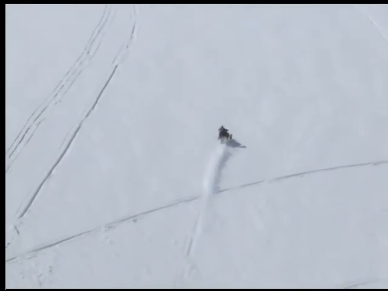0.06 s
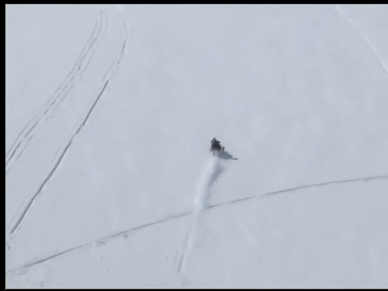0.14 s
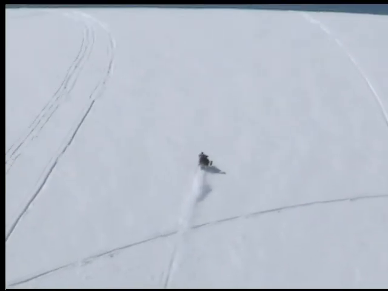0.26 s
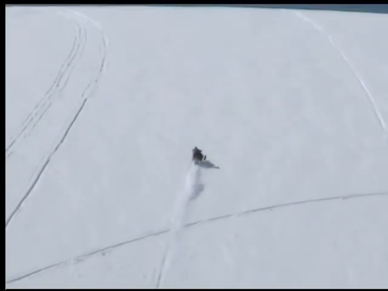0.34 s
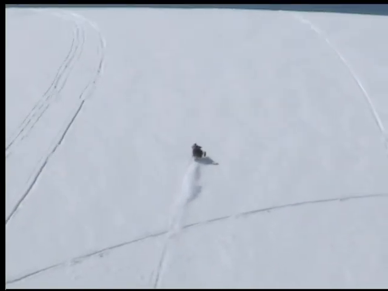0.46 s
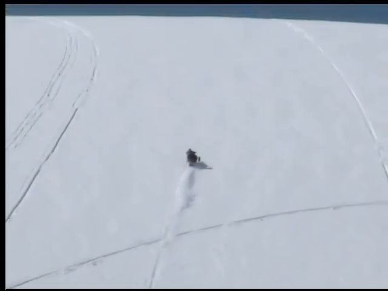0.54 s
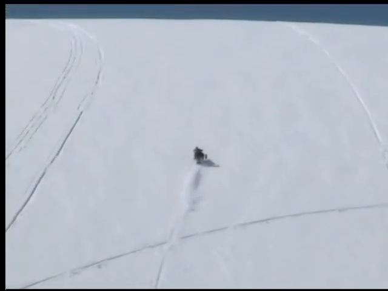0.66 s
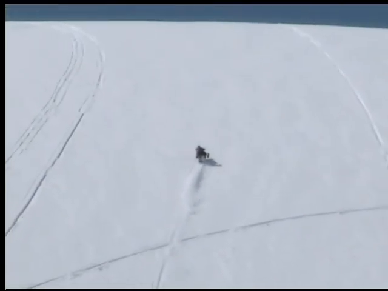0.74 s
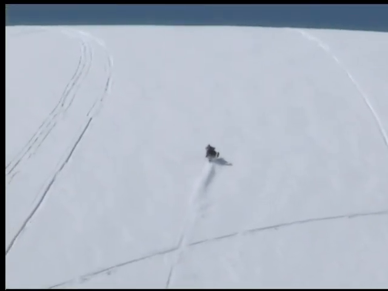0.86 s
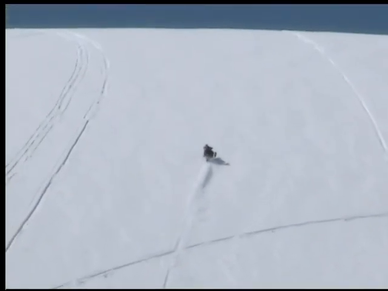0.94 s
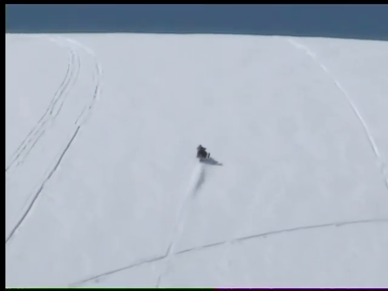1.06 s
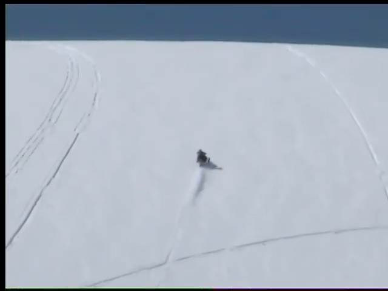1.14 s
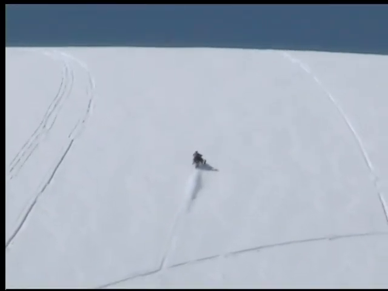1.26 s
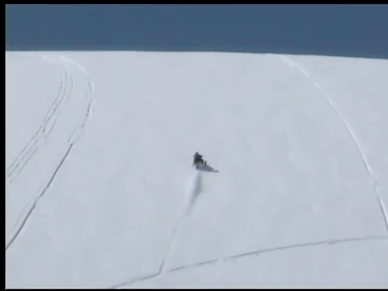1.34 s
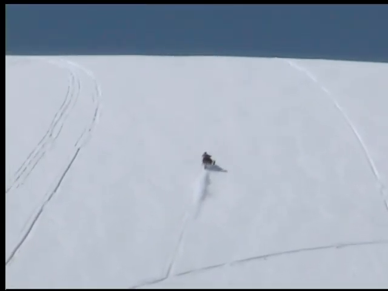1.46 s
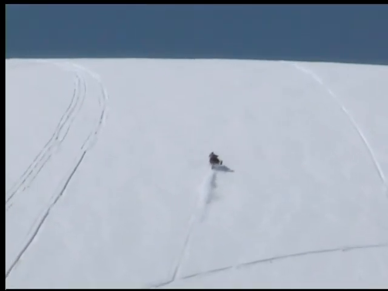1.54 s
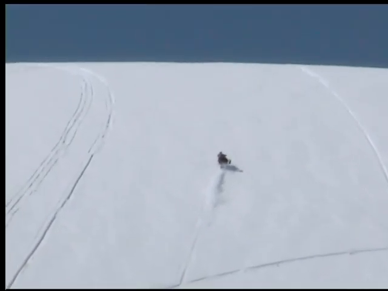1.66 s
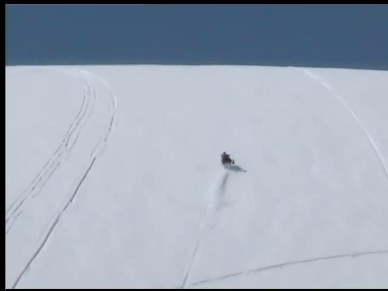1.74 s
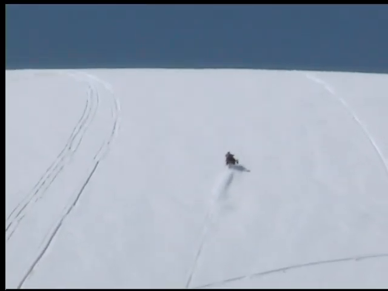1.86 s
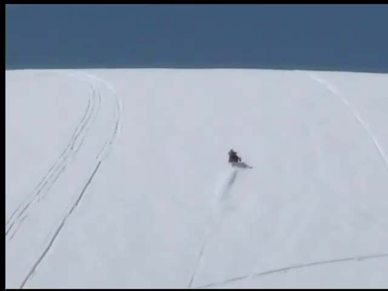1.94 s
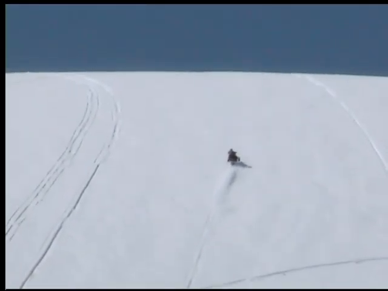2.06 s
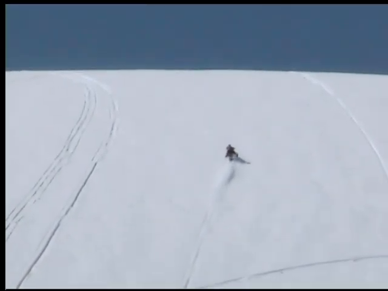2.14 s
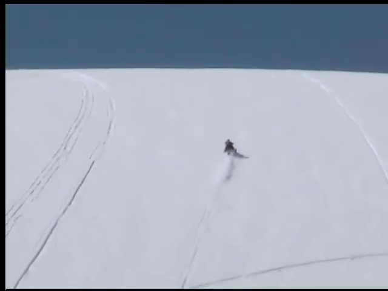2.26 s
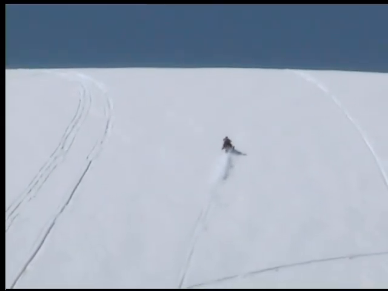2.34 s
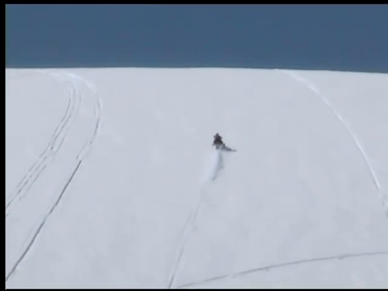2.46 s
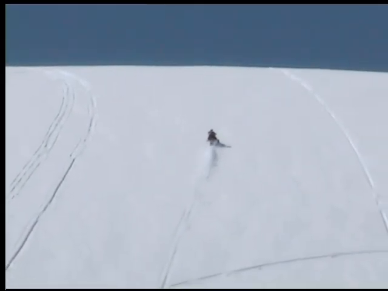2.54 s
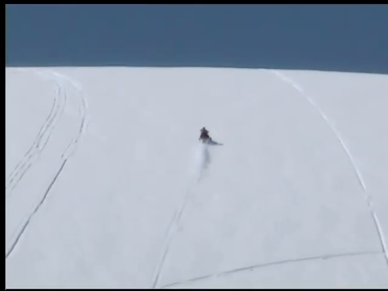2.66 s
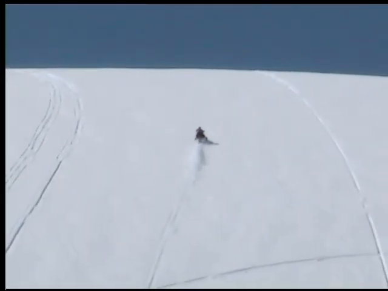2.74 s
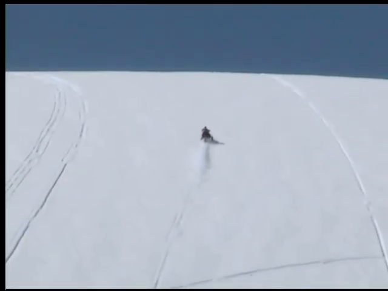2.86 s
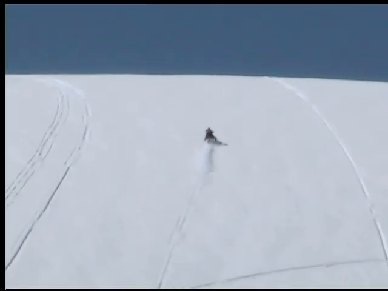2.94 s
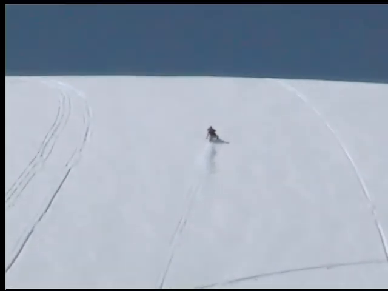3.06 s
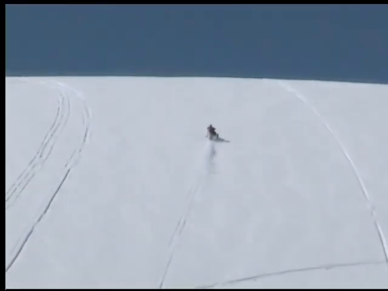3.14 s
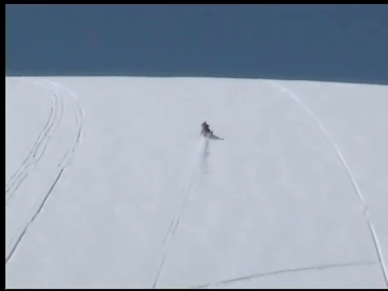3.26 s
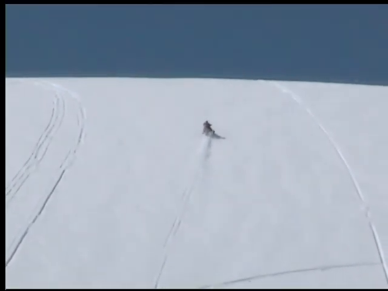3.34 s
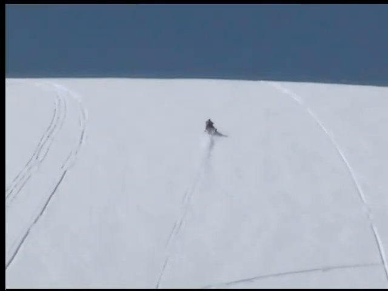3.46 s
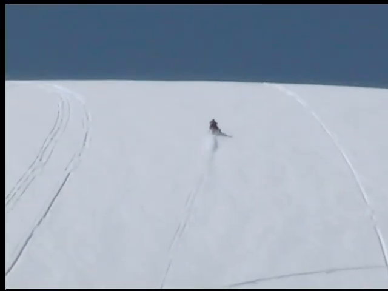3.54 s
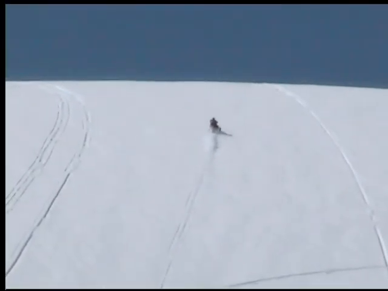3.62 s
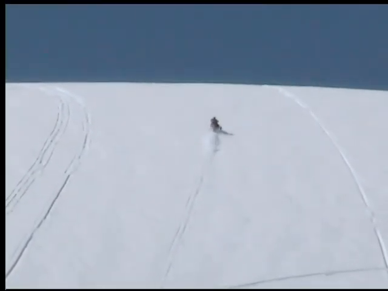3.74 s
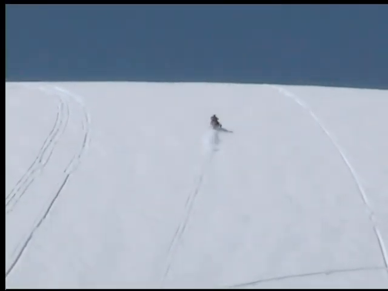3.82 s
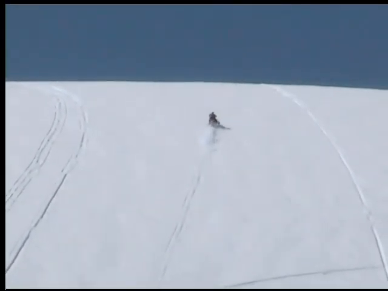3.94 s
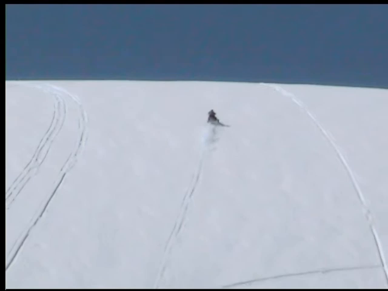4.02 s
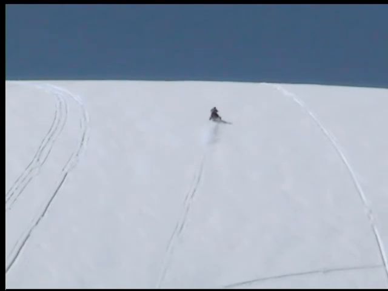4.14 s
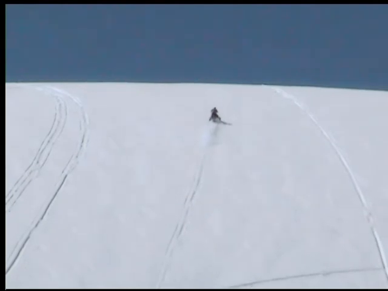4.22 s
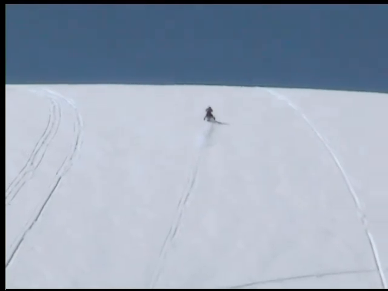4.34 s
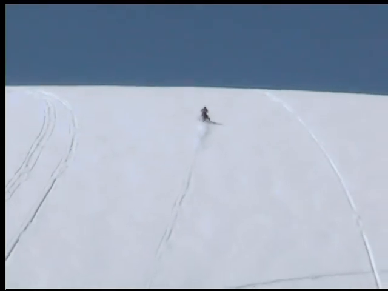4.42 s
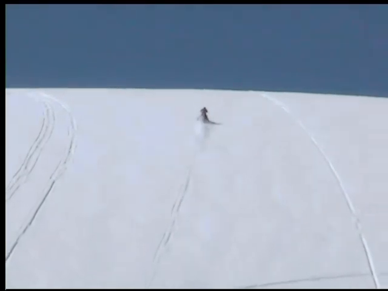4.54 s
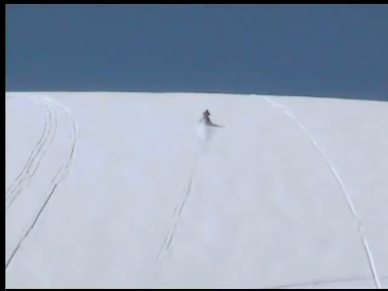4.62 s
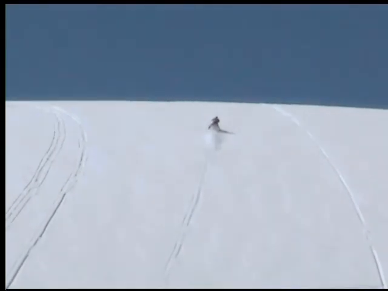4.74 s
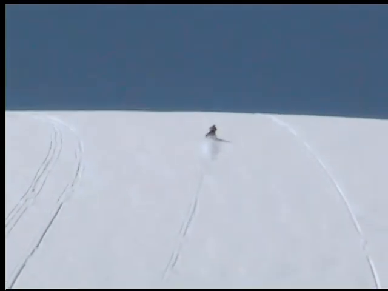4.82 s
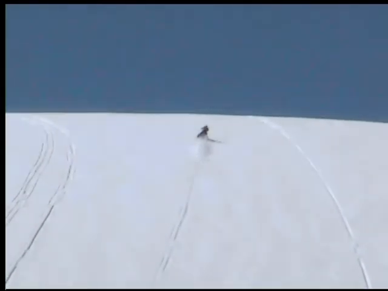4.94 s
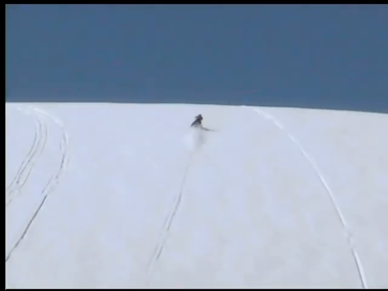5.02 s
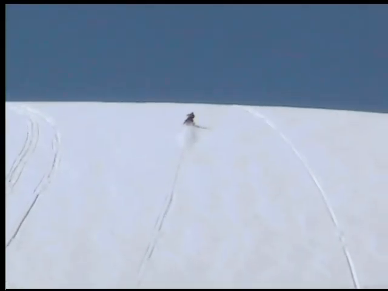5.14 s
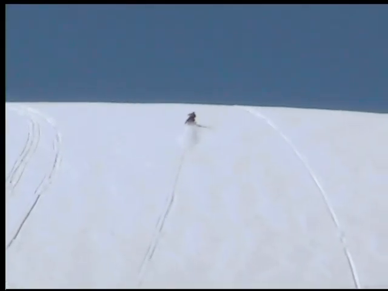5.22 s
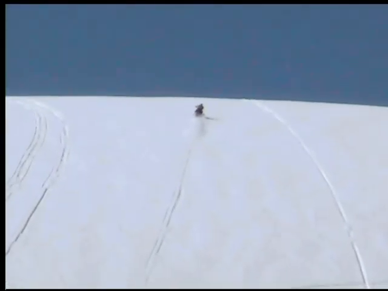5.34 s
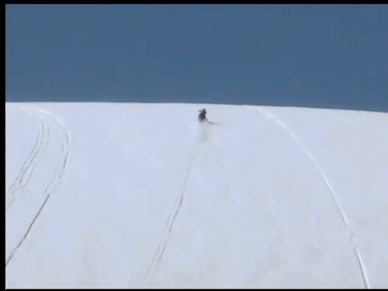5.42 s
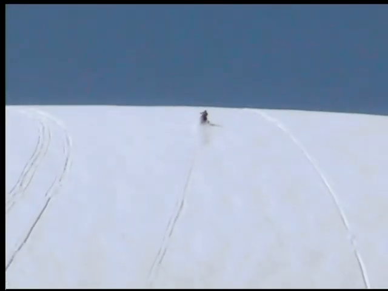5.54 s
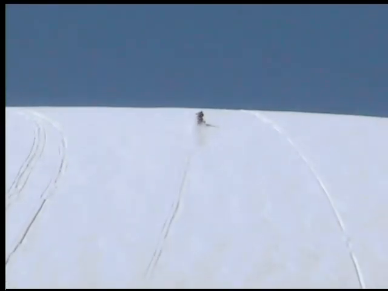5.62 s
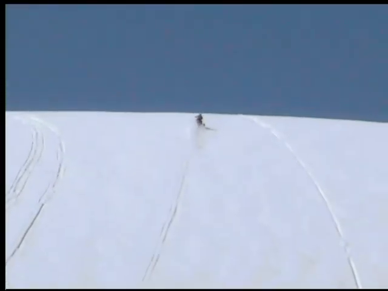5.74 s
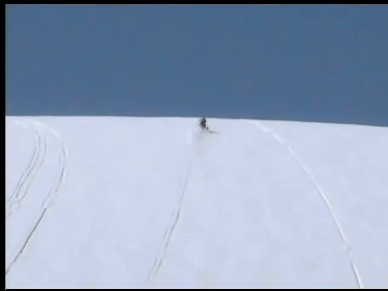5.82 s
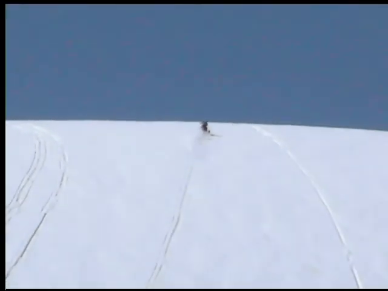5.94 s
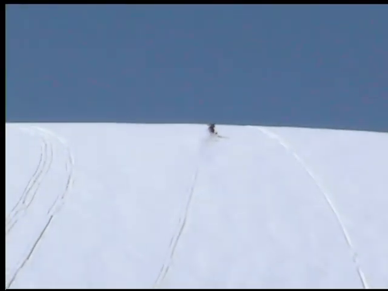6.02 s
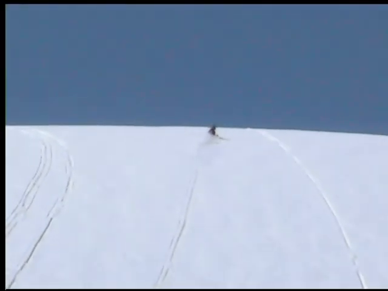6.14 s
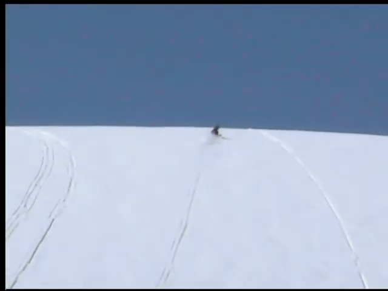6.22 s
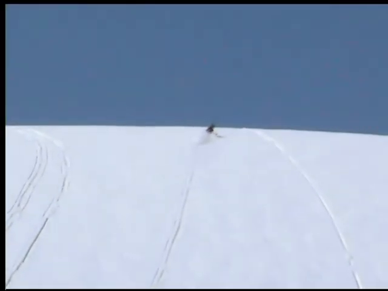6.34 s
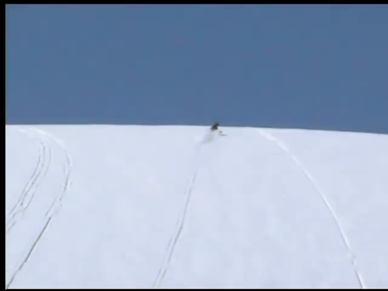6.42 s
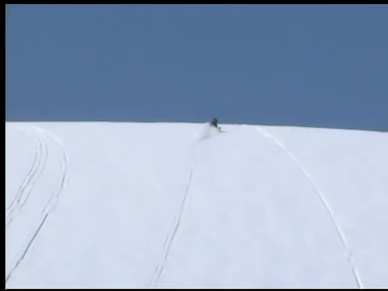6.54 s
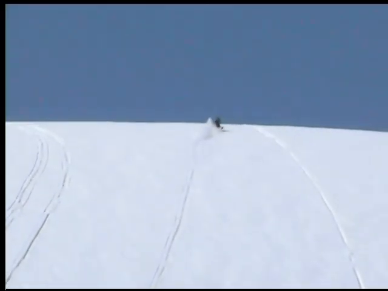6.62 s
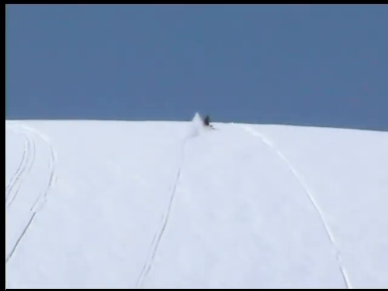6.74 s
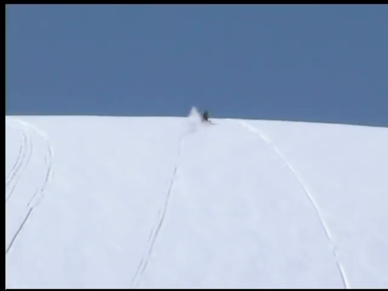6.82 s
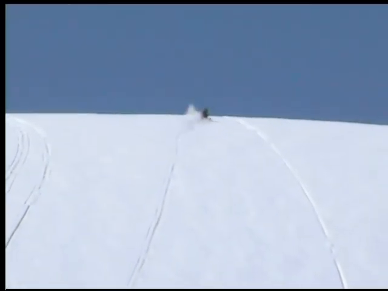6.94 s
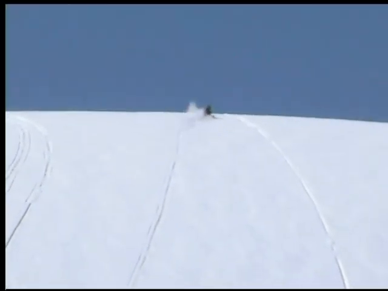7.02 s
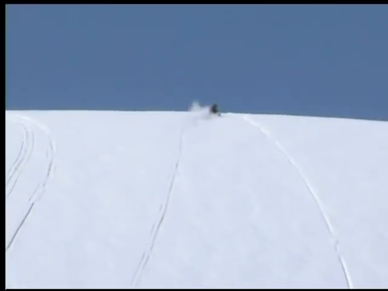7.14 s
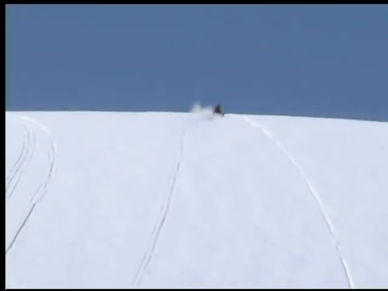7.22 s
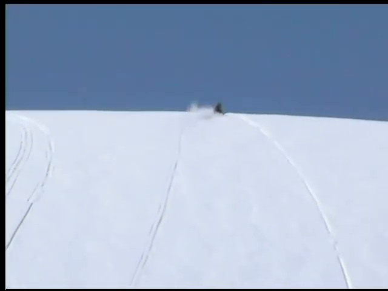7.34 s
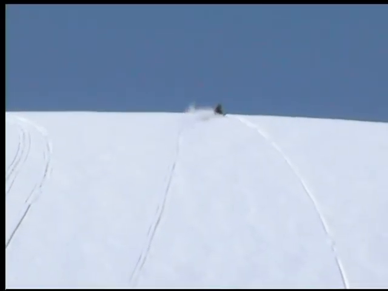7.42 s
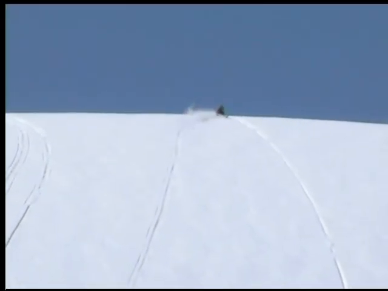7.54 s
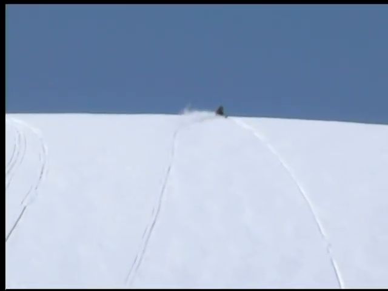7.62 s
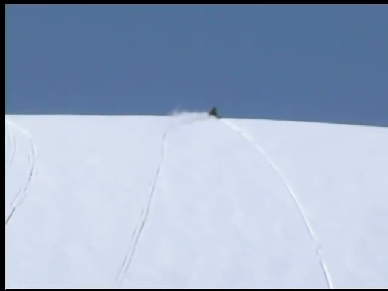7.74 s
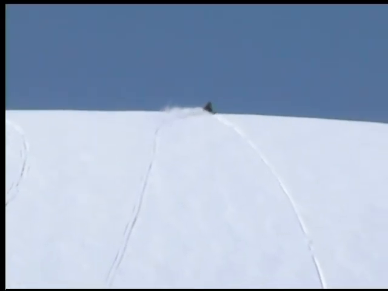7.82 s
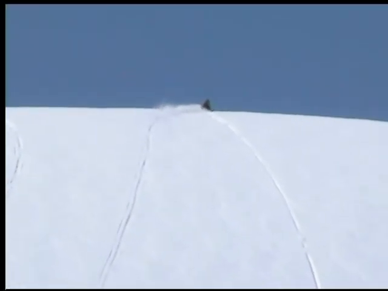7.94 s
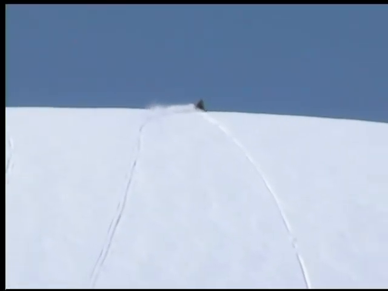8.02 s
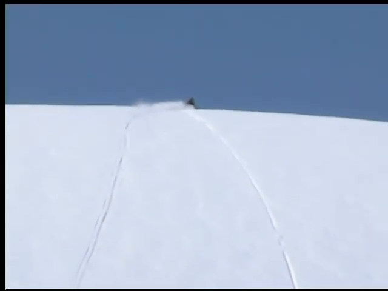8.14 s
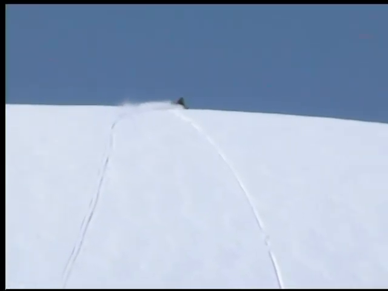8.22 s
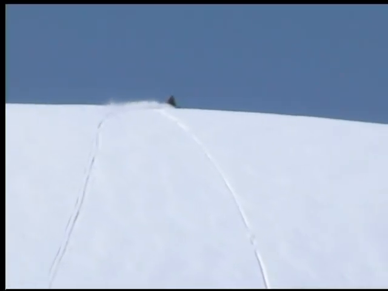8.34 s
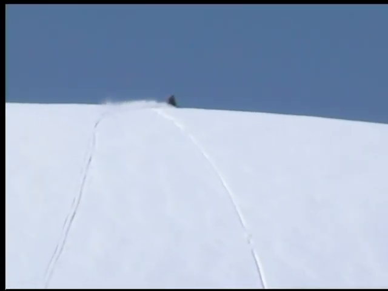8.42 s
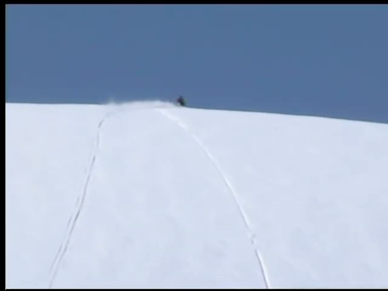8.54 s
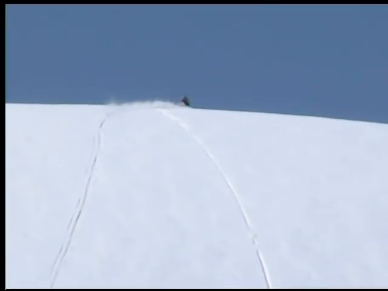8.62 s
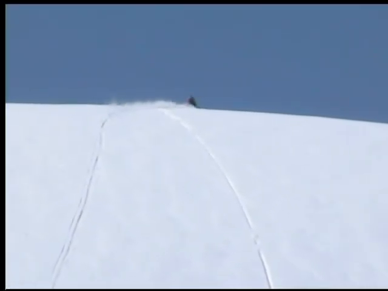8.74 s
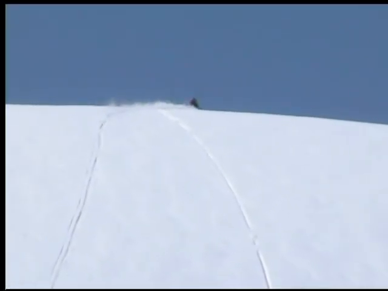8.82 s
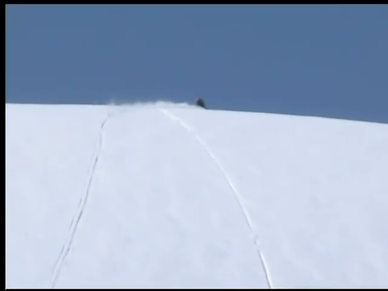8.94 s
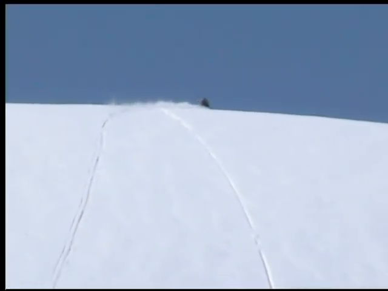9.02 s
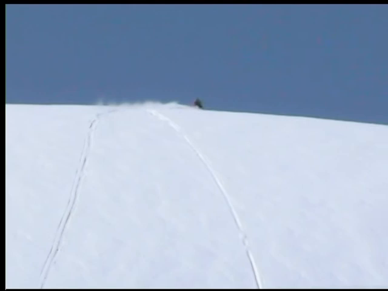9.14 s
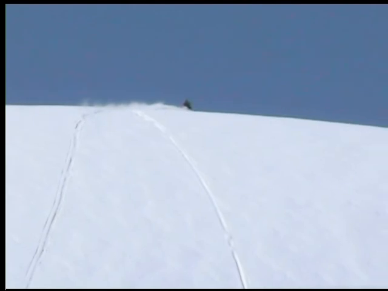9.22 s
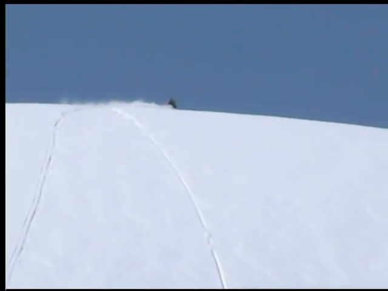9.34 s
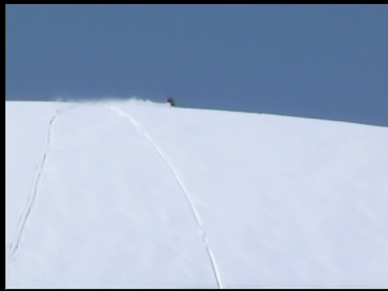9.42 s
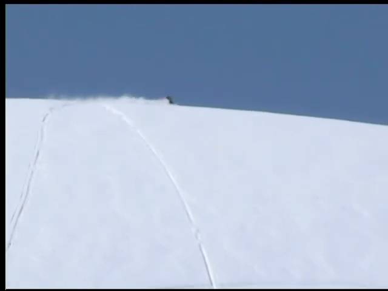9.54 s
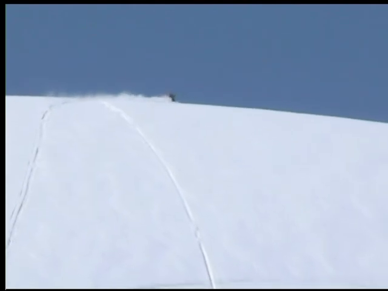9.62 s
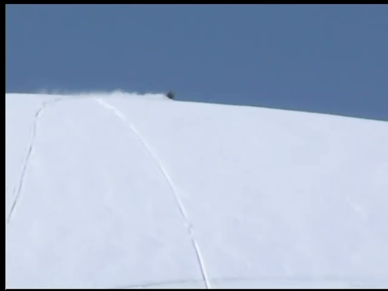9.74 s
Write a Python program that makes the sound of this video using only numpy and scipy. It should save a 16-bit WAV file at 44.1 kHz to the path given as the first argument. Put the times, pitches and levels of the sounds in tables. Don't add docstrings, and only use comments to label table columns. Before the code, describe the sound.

A snowmobile engine howls up an open snow slope, surging and rasping, then fades into the distance over camcorder hiss and faint mechanical whirr.

```python
import sys
import numpy as np
from scipy import signal
from scipy.fft import rfft, irfft
from scipy.io import wavfile
from scipy.ndimage import uniform_filter1d

SR = 44100
rng = np.random.default_rng(int(sys.argv[2]) if len(sys.argv) > 2 else 0)


def int16_out(signal):
    q = np.round(np.clip(np.atleast_2d(signal).T, -1, 1) * 32767)
    wavfile.write(sys.argv[1], SR, q.astype(np.int16))


def volts_from_db(level):
    exponent = np.asarray(level, float) / 20
    return 10 ** exponent


N = 430857
LOADED_HZ = 79.5
DRUM_HZ = 149.9874
FADE_WIDTH_HZ = 45
DRONE_DB_PER_HZ, RASP_DB, MOUTH_DB = 0.22, -17.5, 13.5
DEEP_DB, DEEP_DB_PER_S = -36, -1.47
SCRAMBLE_RAD, SCRAMBLE_S = 1.1, 1.6

# time in seconds, pipe howl in dB, low drone against the howl in dB.
CLIMB = [(0.0, -25, -8.5), (0.47, -26.5, -4), (0.65, -30, -2.5), (1.4, -31, -0.5), (1.9, -32.5, -3.5),
         (2.9, -33, -0.5), (3.61, -35, 2.5), (4.7, -36, 0), (5.1, -39.5, 4), (5.43, -35.5, -1.5),
         (5.9, -40, 2), (6.1, -36.5, -3), (7.09, -40, -0.5), (7.64, -42.5, 0), (8.02, -46.5, 2.5),
         (8.4, -44.5, -1), (9.24, -52, 3), (9.77, -53, 3)]
# centre in seconds,
# rise in Hz (negative: dip), length in seconds, extra rasp in dB.
SURGES = [(-0.083, 6.5, 0.23, -3), (0.236, 5, 0.15, -0.5), (0.477, 5, 0.21, -1), (0.411, 3.357, 0.05386, 2),
          (0.897, 5.5, 0.191, -0.6), (1.378, 8, 0.33, 0.5), (1.738, 2.5, 0.082, -1.5), (1.89, 7, 0.13, 0.5),
          (2.308, 4.5, 0.31, 0.4), (2.712, 5.5, 0.39, -0.5), (3.062, 2.5, 0.09, 2.5),
          (3.309, 7.5, 0.21, 2.5), (3.815, 6, 0.28, 3.5), (4.427, 3.5, 0.15, -1.5), (4.851, 6.5, 0.17, -2),
          (5.132, 3, 0.11, 0), (5.396, 6.5, 0.24, 2), (6.044, 6, 0.233, -4.5), (6.614, 8, 0.2, -3),
          (7.082, 6, 0.13, 2), (7.648, 9.5, 0.21, -1.5), (8.39, 2.5, 0.14, 10.5), (8.451, 3, 0.53, -4.5),
          (9.138, 5, 0.21, -1), (9.605, 7, 0.14, 0), (9.734, 3, 0.053, 5), (0.352, 0.5, .05, -1),
          (1.25, -0.46, .06, -0.5), (2.05, 0.53, 0.201, 0), (2.656, -.5, .05, 0), (4.46, 0.51, .05, -0.5),
          (4.699, -0.2, .12, -1), (6.457, 1.4, .07, 0.5), (6.899, 1.4, .12, -0.5), (7.35, -0.6, .06, 1.5),
          (7.708, -.5, .12, -2.5), (9.554, 1.05, .06, -2.5)]
# centre in seconds, length in seconds, rasp in dB.
LULLS = [(0.523, .06, 0.5), (2.328, 0.064, 6), (3.18, .08, -2), (4.6, 0.037, 10), (5.446, 0.041, -14),
         (5.997, 0.046, 8.5), (6.355, 0.042, 2), (6.653, 0.041, 5), (6.899, 0.045, -11.5),
         (7.23, 0.035, -6.5), (7.473, 0.066, 7.5), (7.968, 0.15, -2), (8.679, 0.12, -13),
         (9.152, 0.049, -8)]
# time in seconds, share in view (0-1).
MOUTH_VIEW = [
    (0, .05),
    (5.9, .1),
    (6.1, .3),
    (8.2, .3),
    (8.82, .25),
    (8.9, .9),
    (9.77, .9),
]
# multiple of the firing rate, level in dB.
HARMONICS = [(1, -14), (2, -23), (3, -6.5), (4, -7), (5, -4.5), (6, -14), (7, 1), (8, 4.5), (9, -6),
             (10, -15.5), (11, -20.5), (12, -21), (13, -17), (14, -25.5), (15, -25)]
# multiple of the firing rate, level in dB.
HALF_ORDERS = [(2.5, -37), (5.5, -27), (7.5, -47)]
# multiple of the firing rate, level in dB.
SHARP_EDGE = [(16, -29), (17, -30), (18, -39), (19, -32), (20, -33)]
# centre in Hz, width in Hz, depth in dB.
PIPE_DIPS = [(348.3, 9.6, -3), (830, 47, -2.5), (404, 29, -4)]
# resonance in Hz, width in Hz, lag in half turns.
CHAMBERS = [(210, 90, -.65), (315, 40, .45), (390, 40, -.2), (540, 110, 2), (725, 50, -.2), (875, 30, 1.45),
            (1070, 30, .2), (1150, 40, .4)]
# time in seconds, lag in radians.
SNOW_LAG = [
    (0, 0),
    (2.3, 0),
    (2.7, -.6),
    (4.3, -.6),
    (5.3, .4),
    (8, .6),
    (9.77, 1.2),
]
# centre in seconds, pitch in Hz, length in seconds, dB.
FADES = [(0.04, 599, 0.1, -14.5), (0.29, 690, 0.11, -9), (0.58, 652, 0.15, -18), (1.155, 597, 0.19, -7.5),
         (1.436, 703, 0.17, -16), (1.623, 590, 0.11, -4.5), (1.775, 692, 0.089, -9),
         (1.967, 684.3, 0.058, -6), (2.13, 580, 0.087, -8.5), (2.261, 686, 0.07, -8),
         (2.822, 666, 0.28, -3), (3.328, 612, 0.17, -2), (3.325, 669, 0.1, -11), (3.79, 685, 0.042, -3.5),
         (3.847, 597.6, 0.1, -2), (4.187, 647, 0.127, -5), (4.88, 687, 0.072, -8), (5.213, 678.7, 0.1, -4),
         (5.54, 676.2, 0.12, -5.5), (5.69, 571, 0.27, -3.5), (6.277, 650, 0.21, -2.5),
         (6.31, 572, 0.11, -5), (6.873, 577, 0.071, -8), (6.896, 659, 0.062, -6.5), (7.3, 561, 0.098, -4),
         (7.752, 695, 0.047, -5), (8.632, 657, 0.44, -3.5), (9.173, 680.4, 0.081, -1.5)]
# centre in seconds,
# pitch in Hz, length in seconds, dB.
PATCHES = [(0.029, 944, 0.067, -17.5), (0.27, 880, 0.17, -28), (0.394, 790, 0.051, -13),
           (0.46, 519, 0.25, -11.5), (0.475, 345.4, 0.21, -7), (0.612, 924, 0.139, 12),
           (0.931, 771, 0.25, -17.5), (1.015, 1021, 0.16, -15.5), (1.21, 942, 0.091, 8.5),
           (1.864, 787, 0.11, -5), (2.333, 345, 0.1, -7), (2.854, 338, 0.17, -8), (2.926, 758, 0.044, -7.5),
           (4.185, 724.4, 0.078, -3), (4.212, 888, 0.11, 8.5), (4.233, 404, 0.301, -8),
           (5.224, 1020, 0.22, -18), (6.481, 1025, 0.44, 5), (6.62, 350, 0.14, -6.5),
           (7.246, 729.5, 0.33, 4.5), (7.489, 1023, 0.13, 8), (8.348, 931, 0.56, -19),
           (8.41, 340, 0.18, -9.5), (9.07, 1013, 0.2, 7), (9.111, 340, 0.17, -10), (9.313, 900, 0.33, 8),
           (9.53, 1024, 0.39, 5.5), (9.566, 346, 0.12, -5), (9.67, 1030, 0.35, 9.5), (9.8, 778, 0.2, 9),
           (0.498, 765, 0.36, 4), (0.698, 168, 0.57, -7.5), (0.85, 340.3, 0.13, -4),
          (1.368, 428, 0.25, -6.5), (1.6, 854, 0.12, -2), (1.857, 349.2, 0.096, -6), (2.097, 850, 0.099, 6),
          (2.546, 1125, 0.13, 5), (2.6, 342.4, 0.39, -1.5), (2.6, 432.2, 1, -3), (2.621, 776.5, 0.21, -4.5),
          (2.75, 1040, 0.15, -6.5), (2.85, 1214, .12, 12), (3.605, 420, 0.14, -5),
          (3.613, 337.7, 0.1, -5.5), (3.9, 505, 0.13, -1), (3.9, 843, .12, 0), (4.15, 330, 0.33, -6),
          (4.4, 165, 0.43, 4), (4.7, 1000, .4, 3), (4.9, 1105, 0.216, 7.5), (5.098, 770, 0.2, -5),
          (5.1, 510, .3, 7.5), (5.2, 855, 0.28, -10.5), (5.354, 343.7, 0.058, -2.5),
          (5.348, 939.5, 0.2, -15), (5.926, 597, 0.048, -2), (5.929, 673, 0.033, 0), (6.252, 760, 0.27, 2),
          (6.385, 427, 0.12, 2.5), (7.75, 330.9, 0.242, -6.5), (7.8, 830, 0.46, -1), (7.8, 165, .3, -2),
          (7.85, 990, .12, -4), (7.9, 494, 0.35, 3.5), (8.3, 1089, 0.15, -4.5), (8.5, 749, .3, 0),
          (8.601, 417.7, .15, 2.5), (8.9, 1116, 0.59, 5.5), (9.4, 860, 0.17, 3), (0.95, 930, 0.31, -2.5),
          (1.0, 773, 0.37, 4.5), (1.101, 1195, 0.34, 7.5), (2.601, 950, 0.14, -5), (3.5, 1185, .45, 6),
          (4.85, 1200, 0.17, 11), (5.834, 640, .04, 0.5), (5.97, 627, .02, 0.5), (6.2, 950, 0.37, 1),
          (7.7, 1320, 0.32, 7),
           (1.103, 1020, .25, 3), (1.55, 1030, .15, 6.5), (1.85, 783, .12, -2.5), (3.1, 1200, 0.18, 4),
          (3.9, 1020, .25, 2.5), (4.1, 735, .12, -1), (4.15, 1140, .25, -6), (4.45, 1225, .4, 5),
          (4.85, 772, 0.05, -5), (5.05, 852, .12, 6.5), (5.05, 1035, 0.14, 2), (5.4, 945, .2, 4),
          (6.05, 1365, .2, 8), (6.05, 1450, .2, 13), (7.1, 1275, .25, 5), (7.1, 1020, 0.094, 1.5),
          (7.5, 920, .4, 4), (7.65, 1420, 0.31, 16), (8.3, 920, .2, 4), (8.55, 755, .15, -0.5),
          (8.7, 1260, .5, 11), (9.15, 850, .2, -2), (9.4, 1270, .3, 6), (9.45, 1107, 0.22, 3.5),
          (6.9, 1100, .6, 1), (8.1, 1010, .4, -8), (0.37, 870, .1, 9), (2, 1237, .25, 6),
          (9.597, 850, .2, 2), (8.4, 1090, .2, -7), (1.3, 260, .2, -1), (0.55, 430, 0.23, -3.5),
          (9.1, 1020, .2, 2.5), (9.15, 1640, .2, 7)]
# time in seconds, beats a second, level against that order in dB.
TRACK_BEAT = [
    (0.0, 6.0, -13.5),
    (3.3, 6.0, -16),
    (3.75, 5.22, -21),
    (4.65, 10.15, -14),
    (4.85, 12, -11),
    (6.61, 12.1, -16),
    (7.24, 13.5, -11),
    (7.8, 12.8, -14),
    (8.3, 17, -13),
    (9.77, 17, -9),
]
# frequency in Hz, level in dB.
PUFF = [(30, -50), (60, -34.5), (130, -17), (250, -4.5), (420, -2), (650, 1.5), (850, 2), (1100, -28),
        (1500, -20), (2200, -18.5), (3200, -29), (5000, -52)]
# frequency in Hz, level in dB.
RASP = [(700, -35.5), (880, 5), (1040, 7.5), (1200, 0), (1420, 1.5), (1650, -10.5), (1850, -0.5),
        (1980, -23), (2100, -17.5), (2600, -18.5), (3400, -38.5), (5000, -51.5), (12000, -58.5)]
# frequency in Hz, level in dB.
MOUTH = [(750, -25), (900, -10), (1040, 0), (1180, -9), (1480, -17), (1660, -1.5), (1820, -17), (2300, -25),
         (3400, -38)]
# time in seconds, peak in dB.
POPS = [(0.16, -48), (0.3267, -53.5), (0.5102, -48), (0.6245, -52.5), (0.7427, -51), (1.1657, -41.5),
        (1.272, -44.5), (1.5599, -46), (1.7434, -42), (1.967, -55), (2.0847, -48), (2.199, -48),
        (2.2977, -40.5), (2.633, -42.5), (2.8185, -51.5), (3.6143, -57.5), (3.7673, -56), (4.9506, -57.5),
        (5.34, -50.5), (5.5987, -55.5), (6.0282, -55), (6.3528, -49.5), (6.6367, -52.5), (7.488, -45.5),
        (8.2786, -49.5), (8.4941, -48), (8.9336, -60.5), (9.398, -56.5), (9.669, -71.5)]
# frequency in Hz, level in dB.
CRACK = [(900, -32.5), (1500, 6), (2300, 2), (3300, -16.5), (5000, -40.5)]
# time in seconds, peak in dB.
SNAPS = [(4.578, -42), (5.9718, -46.5), (6.0192, -41.5), (6.0781, -44.5), (6.121, -44.5), (6.4218, -47),
         (6.542, -44.5), (6.6348, -43), (6.6698, -41.5), (6.7391, -43), (6.9761, -43), (7.0479, -44),
         (8.8329, -43.5), (8.9422, -44.5), (9.0518, -44), (9.3612, -48), (9.4101, -36.5), (9.4705, -43),
         (9.6107, -48), (9.6461, -39.5), (9.7508, -44)]
# frequency in Hz, level in dB.
SNAP = [(700, -31.5), (1000, -6), (1300, -9), (1650, 2), (2000, -9.5), (2500, -14.5), (3400, -31.5)]
# time in seconds, peak in dB.
SPITS = [(2.4728, -48), (2.5651, -54), (2.6334, -48.5), (2.7057, -48.5), (2.8185, -52), (2.9367, -51),
         (2.9991, -51), (3.6137, -48), (3.6596, -51), (3.7683, -50), (3.9694, -51.5), (4.1126, -52.5),
         (4.3236, -53), (4.9496, -54.5), (5.3413, -52.5), (5.5987, -48.5)]
# frequency in Hz, level in dB.
SPIT = [(1800, -26), (2350, 0), (2600, -7), (3000, -25.5)]
# frequency in Hz, level in dB.
SHELL = [(1400, -27), (2400, -9.5), (3300, 0), (3900, 7.5), (4250, 8.5), (5050, -4.5), (5700, 4),
         (6300, 2.5), (6900, -12.5), (7600, -16.5), (8900, -1.5), (10200, -14.5), (11700, -8),
         (14300, -32.5)]
# frequency in Hz, level in dB.
PORTS = [(2000, 0), (4000, -4), (5500, -2), (7000, -1.5), (9000, -5), (10500, 1.5), (12000, 0.5),
         (14000, -4.5)]
# multiple of the drum rate, level in dB.
HUM = [(1, -71), (2, -64.5), (8, -67), (10, -67), (17, -74.5), (27, -78.5), (35, -78), (63, -95), (65, -92)]
# time in seconds, peak in dB, pitch in Hz.
TICKS = [(0.161, -49.5, 8800), (2.2807, -48, 9100), (2.352, -58.5, 8105), (2.8379, -47.5, 9610),
         (3.8023, -46.5, 8200), (4.479, -45, 8690), (5.3185, -60.5, 8970), (5.4485, -54.5, 9740),
         (6.7082, -53, 8690), (7.285, -53, 8110), (8.9321, -62.5, 8920), (9.2853, -57, 8110)]
# time in seconds, peak in dB, pitch in Hz.
KNOCKS = [
    (5.0256, -41, 2850),
    (5.0257, -45, 4000),
]
# frequency in Hz, level in dB.
HISS = [(20, -26), (80, -16.5), (250, -16), (600, -8), (1100, -18), (1650, -15.5), (2100, -23),
        (3300, -30.5), (4100, -31.5), (5900, -28.5), (6800, -36), (10200, -34.5), (12500, -44.5),
        (14400, -43.5)]
# frequency in Hz, level in dB.
HISS_SIDE = [(20, 1), (60, 4.5), (300, -4), (700, -20), (1500, -20), (2500, -19.5), (4200, -6), (6000, -15),
             (7300, -18.5), (10200, -10), (12500, -17.5), (14400, -35.5)]
# low edge in Hz, high edge in Hz, share of time silent.
WEAK_BANDS = [(1980, 2025, .97), (2025, 2150, .5), (2350, 2450, .45), (3510, 3820, .996),
              (13750, 14100, .55)]


def engine():
    turn = np.clip(curve(MOUTH_VIEW)[0], 0, 1)
    hz, howl_db, rasp_db, drone_db = controls(turn)
    turns = np.cumsum(hz) / SR
    scatter = rng.standard_normal((N // 300, 3))[turns.astype(int)]
    scatter = uniform_filter1d(scatter, size=150, axis=0).T
    howl7_db = howl_db + air_db(7 * hz)
    howl8_db = howl_db + air_db(8 * hz)
    power = volts_from_db(2 * drone_db) + volts_from_db(2 * howl7_db) + volts_from_db(2 * howl8_db)
    loud_db = uniform_filter1d(10 * np.log10(power), size=9000)
    order_db = dict(HARMONICS)
    guide = {1: DEEP_DB + DEEP_DB_PER_S * np.arange(N) / SR,
             4: drone_db - 0.5,
             7: howl_db - order_db[7],
             8: howl_db - order_db[8],
             10: loud_db - 6,
             12: loud_db - 4.0,
             14: uniform_filter1d(rasp_db, size=5000) + 9.5 + 4.0 * turn}
    lines = firing_lines(hz, turns, scatter, guide)
    lugs = track(turns, order_db[3] + guide[4])
    gas = exhaust_gas(turns, scatter, turn, loud_db, rasp_db)
    mouth = snaps(SNAPS, SNAP, trim_db=-2.0) + snaps(SPITS, SPIT, trim_db=-3.5)
    return lines + lugs + gas + mouth + snow_spray(loud_db)


def controls(turn):
    hz = fine(LOADED_HZ + sum(rise * swell(s, length_s) for s, rise, length_s, _ in SURGES))
    hz = hz + .12 * walk(9)
    howl_db, bass_db = curve(CLIMB)
    effort_db = sum(db * swell(s, length_s) for s, _, length_s, db in SURGES)
    effort_db = effort_db + sum(db * swell(s, length_s) for s, length_s, db in LULLS)
    rasp_db = uniform_filter1d(howl_db, size=44100) + RASP_DB + MOUTH_DB * turn + fine(effort_db)
    drone_db = howl_db + bass_db + DRONE_DB_PER_HZ * (hz - 85)
    return hz, howl_db, rasp_db, drone_db


def firing_lines(hz, turns, scatter, guide):
    timing = turns + 0.0018 * scatter[0]
    snow_lag = curve(SNOW_LAG)[0]
    scramble = SCRAMBLE_RAD * np.exp(-(np.arange(N) / SR / SCRAMBLE_S) ** 4)
    lines = 0
    for k, db in HARMONICS + HALF_ORDERS + SHARP_EDGE:
        near = min(guide, key=lambda g: abs(g - k - .1))
        shimmer_db = (k not in (7, 8)) * min(.14 * k, 1.8) * walk(3) + .7 * walk(12)
        shimmer_db = shimmer_db + (k > 7) * .8 * scatter[0] + air_db(k * hz)
        at = k * hz[::64]
        chamber_lag = .5 + sum(n * np.arctan2(at * w, f ** 2 - at ** 2) for f, w, n in CHAMBERS)
        lag = snow_lag + fine(chamber_lag) + .85 * max(k - 5, 0)
        lag = lag + (.011 * k + (k > 2) * scramble) * walk(3)
        dip_db = sum(depth_db * np.exp(-((at - at_hz) / width_hz) ** 2)
                     for at_hz, width_hz, depth_db in PIPE_DIPS)
        line_db = db + guide[near] + shimmer_db + fine(dip_db)
        lines = lines + volts_from_db(line_db) * np.sin(2 * np.pi * k * timing - lag)
    return np.sqrt(2) * lines * volts_from_db(1.1 * scatter[1])


def air_db(line_hz):
    total_db = np.zeros(len(range(0, N, 64)))
    for s, at_hz, length_s, db in FADES + PATCHES:
        now_hz = line_hz[min(int(s * SR), N - 1)]
        meets = np.exp(-((now_hz - at_hz) / FADE_WIDTH_HZ) ** 4)
        if meets > 1e-3:
            total_db += db * meets * swell(s, length_s)
    return fine(total_db)


def exhaust_gas(turns, scatter, turn, loud_db, rasp_db):
    gate = .4 + 1.2 * np.exp(-((turns - .25) % 1) / .22) * volts_from_db(2.8 * scatter[2])
    gas = gate * rng.standard_normal((3, N))
    count = np.floor(turns - .25 + .006 * scatter[0])
    fronts = np.diff(count, prepend=0).clip(0, 1) * volts_from_db(2.2 * scatter[2])
    gas[2] += level(fronts, 6)
    puff = level(colour(gas[0] + 0.63 * rng.standard_normal(N), PUFF), -17)
    puff = puff * volts_from_db(loud_db + .6 * walk(9))
    pipe = level(colour(gas[1] + 0.043 * gas[2], RASP), -3.0)
    mouth = level(colour(gas[2], MOUTH), -1.1)
    rasp = np.sqrt(1 - turn) * pipe + np.sqrt(turn) * mouth
    crack = pops() * level(colour(gas[1] + 0.98 * turn * gas[2], CRACK), 0)
    return puff + rasp * volts_from_db(rasp_db + 1.0 * walk(15)) + crack


def pops():
    t = np.arange(N) / SR
    bursts = sum(volts_from_db(db - 6.5) * (t > s) * np.exp(-np.abs(t - s) / 0.038) for s, db in POPS)
    return uniform_filter1d(bursts, size=1100)


def snaps(table, shape, trim_db):
    s, db = np.transpose(table)
    hits = np.zeros(N)
    hits[(s * SR).astype(int)] = volts_from_db(db + trim_db)
    ring = colour(np.arange(N) == 0, shape)[:2048]
    return signal.fftconvolve(hits, ring / np.abs(ring).max())[:N]


def track(turns, order3_db):
    beat_hz, under_db = curve(TRACK_BEAT)
    lugs = 3 * turns - np.cumsum(beat_hz) / SR
    tones = np.sin(2 * np.pi * lugs) + volts_from_db(-9.0 + 2 * walk(9.3)) * np.sin(np.pi * lugs)
    return np.sqrt(2) * volts_from_db(order3_db + under_db) * tones


def snow_spray(loud_db):
    noise = np.diff(rng.standard_normal(N), prepend=0)
    return level(noise, -69.5) * volts_from_db(2.2 * (loud_db + 24.0))


def drum():
    count = int(N / SR * 2 * DRUM_HZ)
    chance = rng.standard_normal((count, 2)).T
    at = (np.arange(count) + .55) / (2 * DRUM_HZ) * SR + 0.1 * chance[0]
    size = (1 + .03 * (-1) ** np.arange(count)) * volts_from_db(1.0 * chance[1])
    taps = at.astype(int)[:, None] + np.arange(-7, 9)
    pulses = size[:, None] * np.sinc(taps - at[:, None]) * np.hanning(18)[1:-1]
    strikes = np.zeros(N + 20)
    np.add.at(strikes, taps, pulses)
    left = level(colour(strikes, SHELL), -60.5)
    right = level(colour(left, PORTS), -60.5)
    t = np.arange(N) / SR
    hum = sum(volts_from_db(db) * np.sin(2 * np.pi * round(k) * DRUM_HZ * t) for k, db in HUM)
    return np.array([later(left, count=1), right]) + hum


def creaks():
    out, t = np.zeros((2, N + 400)), np.arange(400) / SR
    for s, db, hz in TICKS + KNOCKS:
        start = int(s * SR)
        burst = np.sin(2 * np.pi * hz * t) + .3 * rng.standard_normal((2, len(t)))
        envelope = np.exp(-t * hz / 2.8) * np.minimum(t * hz * 4.0, 1)
        out[:, start:start + len(t)] += volts_from_db(db - 3.0) * burst * envelope
    return out[:, :N]


def hiss():
    mid = level(colour(rng.standard_normal(N), HISS), -53.0) * volts_from_db(1.3 * walk(8.9))
    side = level(colour(rng.standard_normal(N), HISS_SIDE), -67.5)
    return np.array([later(mid, count=1) + side, mid - side])


def level(x, db):
    return x * volts_from_db(db) / np.sqrt(np.mean(x ** 2))


def colour(x, table):
    hz, db = np.transpose(table)
    bins_hz = np.fft.rfftfreq(4096, 1 / SR)
    log_gain = np.interp(np.log(bins_hz + 1), np.log(hz), db) * np.log(10) / 20
    cepstrum = irfft(log_gain)
    cepstrum[1:2048] *= 2
    cepstrum[2049:] = 0
    return signal.fftconvolve(x, irfft(np.exp(rfft(cepstrum))))[:N]


def walk(rate):
    k = int(SR / 15 / rate)
    held = np.repeat(rng.standard_normal(N // 400), k)[:N // 15 + k]
    slewed = uniform_filter1d(uniform_filter1d(held, k), k)
    return 1.3 * np.interp(np.arange(N) / 15, np.arange(len(held)), slewed)


def curve(table):
    s, *columns = np.transpose(table)
    return [np.interp(np.arange(N) / SR, s, c) for c in columns]


def swell(s, length_s):
    return np.exp(-((np.arange(0, N, 64) / SR - s) / length_s) ** 2)


def fine(coarse):
    return np.interp(np.arange(N), np.arange(0, N, 64), coarse)


def later(x, count):
    return np.pad(x, (count, 0), mode="edge")[:N]


def scene():
    sled = engine()
    late = .55 * sled + .45 * later(sled, count=1)
    aside = volts_from_db(-29.5) * later(sled, count=370)
    machine = np.array([volts_from_db(1.5) * late + aside, volts_from_db(1.36) * sled - aside])
    return machine + drum() + hiss() + creaks()


def silence_faint_bands(dry):
    spec, hz, out = rfft(dry), np.fft.rfftfreq(N, 1 / SR), dry
    for low_hz, high_hz, share in WEAK_BANDS:
        band = irfft(spec * (hz > low_hz) * (hz < high_hz), N)
        power = uniform_filter1d(band.mean(axis=0) ** 2, size=1200)
        power = power / uniform_filter1d(power, size=80000) ** .38
        faint = power < np.quantile(power, share)
        out = out - .93 * band * uniform_filter1d(1. * faint, size=700)
    return out


def band_limit(x):
    return signal.sosfilt(signal.butter(12, 14420, fs=SR, output="sos"), x)


def record(dry):
    mix = silence_faint_bands(dry)
    return band_limit(mix)


dry = scene()
out = record(dry)
int16_out(out)
```